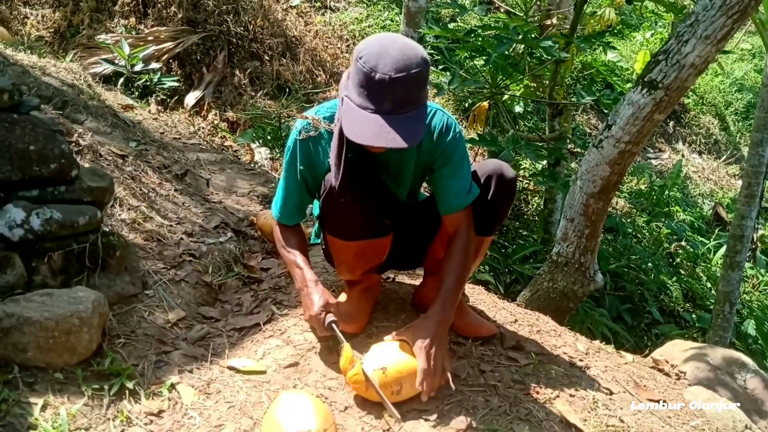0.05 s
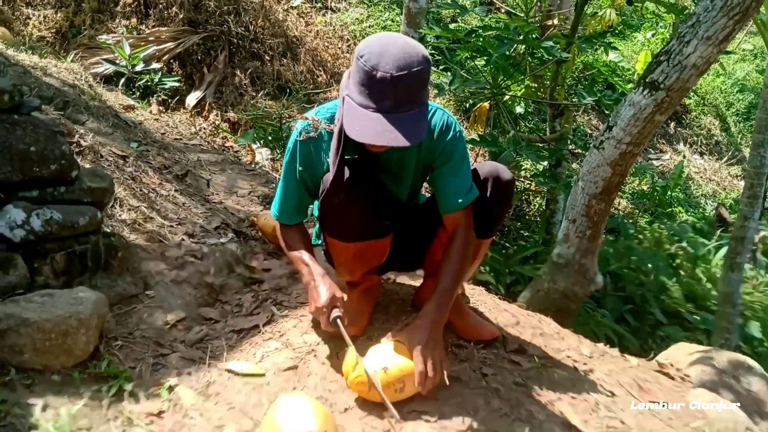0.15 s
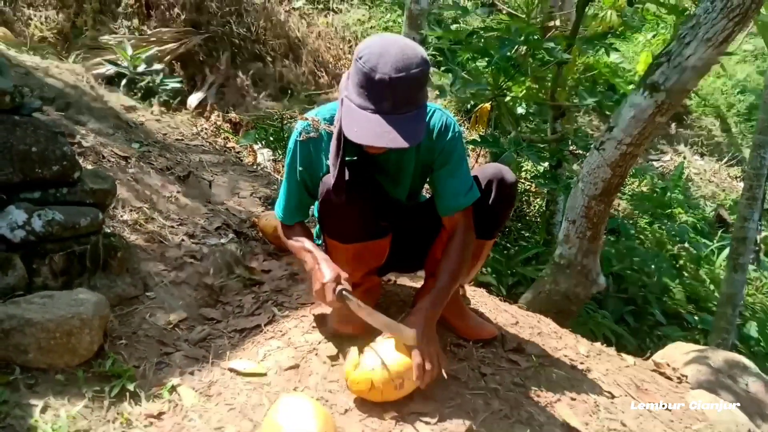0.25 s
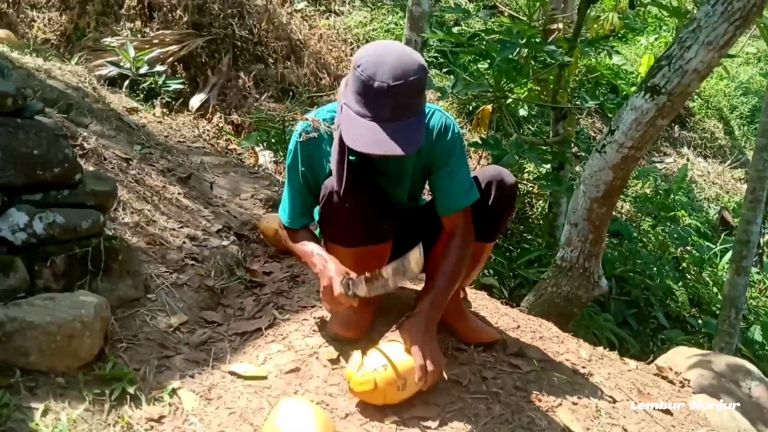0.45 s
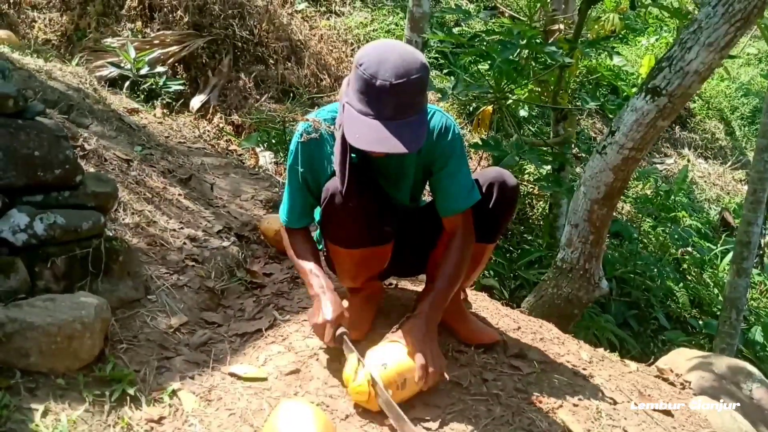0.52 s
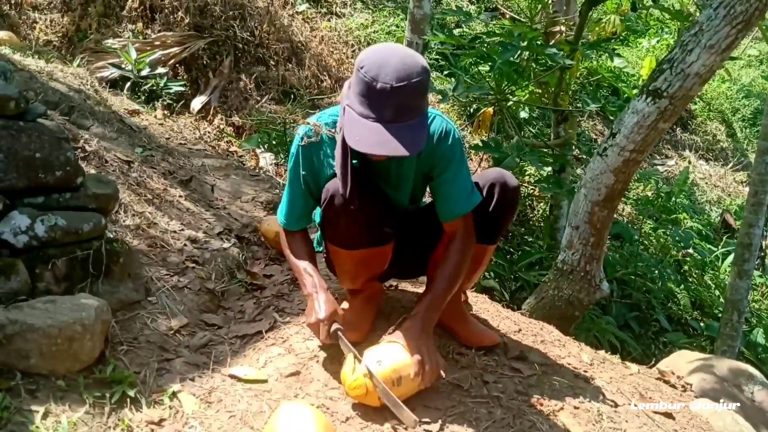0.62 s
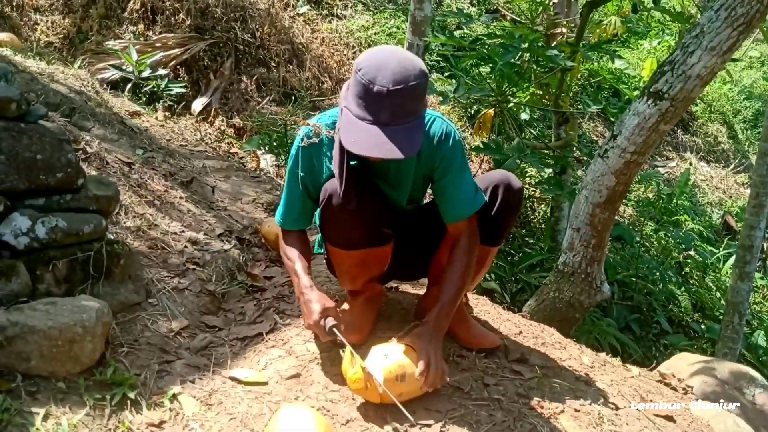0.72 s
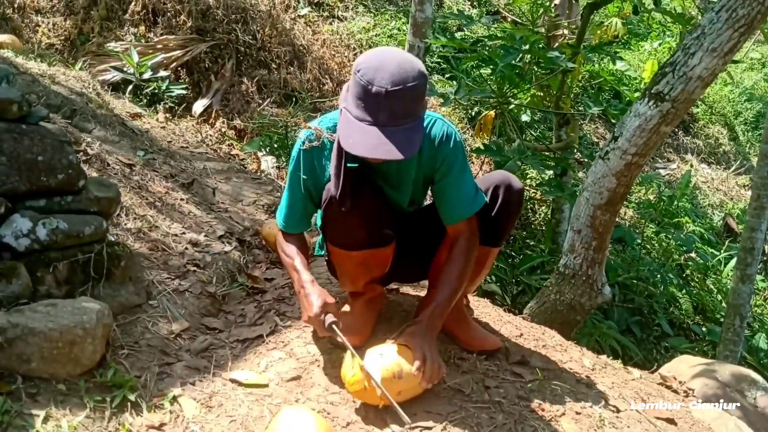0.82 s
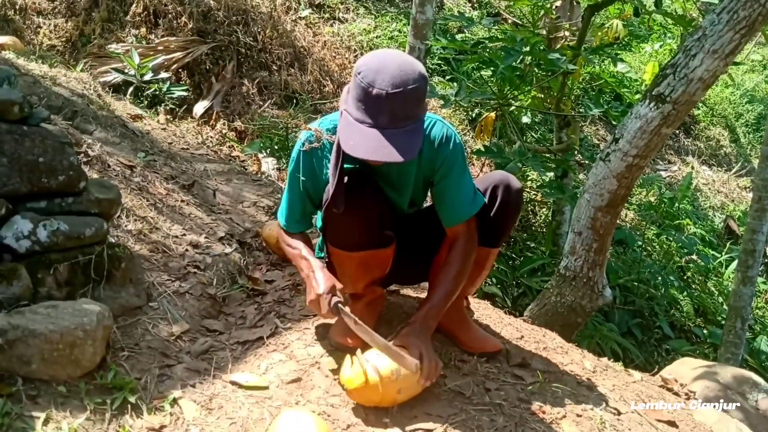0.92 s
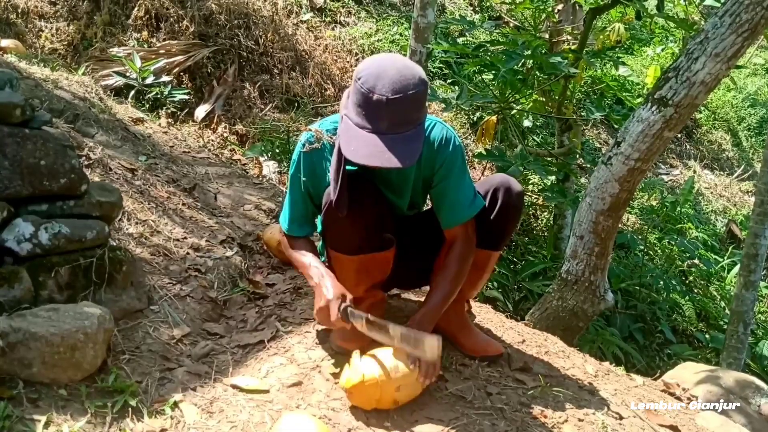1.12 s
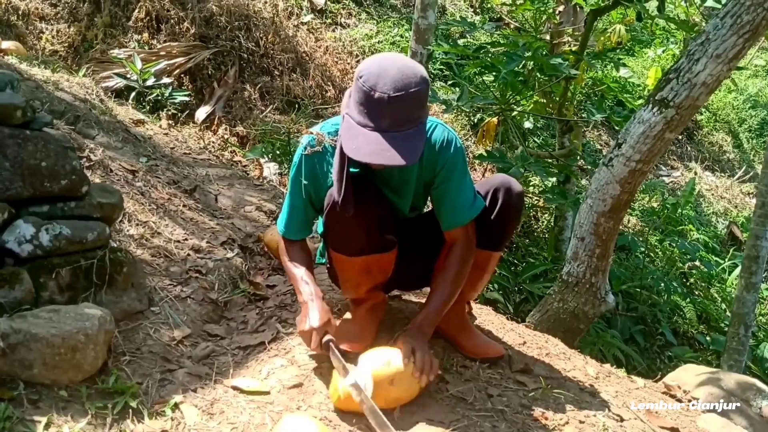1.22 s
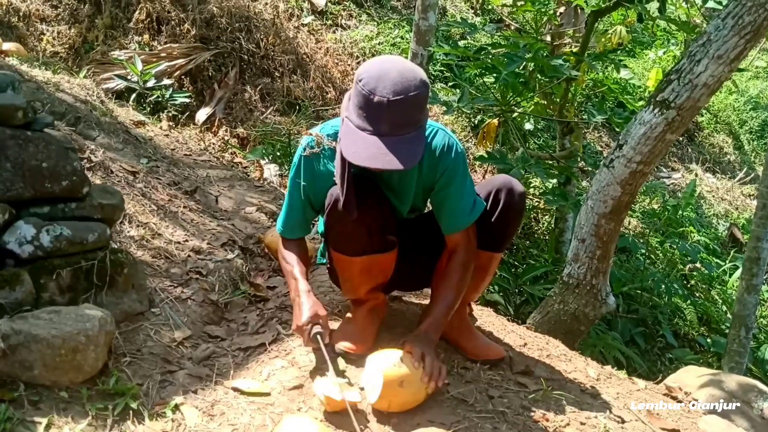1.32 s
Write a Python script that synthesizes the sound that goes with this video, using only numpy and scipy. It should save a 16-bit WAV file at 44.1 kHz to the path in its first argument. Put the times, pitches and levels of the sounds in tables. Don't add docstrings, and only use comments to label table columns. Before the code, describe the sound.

A machete chops a young coconut twice, crackling and wet, about two metres away in a garden. Before the first chop, fingers knock the handheld microphone's shell loudly enough to distort; leaves and distant water hiss softly.

```python
import sys
import numpy as np
from scipy import signal
from scipy.fft import rfft, irfft
from scipy.io import wavfile
from scipy.ndimage import uniform_filter1d

SR = 44100
rng = np.random.default_rng(int(sys.argv[2]) if len(sys.argv) > 2 else 0)


def ratio(d):
    e = np.asarray(d, float) / 20
    return 10 ** e


def int16_out(signal):
    q = np.round(np.clip(np.atleast_2d(signal).T, -1, 1) * 32767)
    wavfile.write(sys.argv[1], SR, q.astype(np.int16))


N = 59535

# (frequency [Hz], density [dB per Hz])
LEAVES_SPECTRUM = [(25, -31.5), (60, -10.5), (110, -7), (250, -10), (370, -2), (800, -9), (1300, -13.5),
                   (3400, -35)]
# (frequency [Hz], density [dB per Hz])
STREAM_SPECTRUM = [(1300, -10.5), (1700, -4), (2000, -.5), (2350, -0.5), (2650, -2.5), (2900, -8.5),
                   (3200, -13), (3700, -29.5)]
# (time [s], level [dB])
STREAM_LEVEL = [(0, -65), (.08, -61), (.14, -57), (.2, -62), (.24, -61), (.55, -64.5), (.7, -61),
                (1.0, -64), (1.35, -58.5)]
# (frequency [Hz], density [dB per Hz])
HISS_SPECTRUM = [(2120, -29), (3600, 3.5), (9620, -7.5), (14900, -2.5), (16000, -15), (16400, -35)]
# (time [s], level [dB])
GRIP_EFFORT = [(0, -49), (.05, -56.5), (.11, -49), (.2, -48.5), (.26, -82), (.4, -51), (0.499, -62.5),
               (.7, -51.5), (.8, -66.5), (1.35, -65)]
# (time [s], level [dB], frequency [Hz], t60 [s])
THUMPS = [(0.063, -42, 61, 0.086), (0.108, -38.5, 84.6, 0.13), (0.152, -40.5, 140, 0.095),
          (0.238, -11, 108, 0.047), (0.246, -24.5, 173, 0.052), (0.248, -30, 101.7, .3),
          (0.329, -26, 122, 0.097), (0.358, -30.5, 106.4, 0.074), (0.384, -44, 111.1, 0.13),
          (0.453, -36.5, 109.5, 0.04), (0.501, -46, 87, 0.032), (0.598, -45, 114, .08),
          (.660, -20, 173, 0.033), (0.665, -21, 90, 0.023), (0.679, -34.5, 130, .04),
          (1.261, -39, 120, 0.041)]
# (time [s], level [dB], hollow modes [dB], tick [dB], ring length [factor])
KNOCKS = [
    (.0628, -22, -5, -50, .95),
    (.1030, -26, -8, -50, 1.2),
    (.131, -36, -6, -45, .9),
    (.6468, -19, -7, -14, 1.9),
    (.2322, 6.5, 3.5, -28, 1.12),
    (.3244, 1.1, 1.2, -70, 1.02),
]
KNOCK_SIGNS = (1, -1, -1, 1, 1, -1)
# (frequency [Hz], t60 [s], left [dB], right [dB], hollow share [0-1])
SHELL_MODES = [(310, .035, -20, -19, .9), (478, .036, -7, -15, .9), (545, .021, -1, -8, .9),
               (852, .015, 14, -6, .1), (1045, .015, 1, -6, .6), (1305, .011, 5, -4, .1),
               (1850, .008, -2, -12, .1), (2490, .008, -6, -20, .1)]
# (frequency [Hz], t60 [s], left [dB], right [dB])
RATTLE_MODES = [(1085, 0.17, -32.5, -52), (1134, 0.22, -37.5, -46), (819, 0.16, -38, -46),
                (1460, .15, -44.5, -38.5), (2290, .16, -51, -51.5), (2600, 0.19, -52, -51.5)]
# (time [s], length [s], start [Hz], end [Hz], level [dB])
PEEPS = [
    (.219, 0.028, 2200, 2220, -76),
    (0.305, 0.029, 2403, 2050, -43),
    (0.352, 0.0146, 2340, 2440, -50),
    (0.81, 0.017, 2008, 2020, -47.5),
]
# (time [s], level [dB], flesh [dB], t60 [s], husk centre [Hz])
TEARS = [(.6000, -21, -7, 0.037, 2610), (0.603, -21.5, 3.5, 0.014, 2720), (0.6074, -22.5, -7, 0.082, 2126),
         (.613, -26.5, -27, 0.037, 1930), (0.6189, -26, 2.5, 0.016, 2560), (0.621, -44, -23, 0.033, 1920),
         (0.6473, -21.5, 0, .009, 2330), (0.65, -41.5, -3, 0.088, 2400), (1.2578, -32.5, -27, 0.07, 2400),
         (1.2592, -27, 4.5, 0.037, 1840), (1.2627, -32.5, -1, 0.064, 1990),
         (1.2742, -31.5, -8, 0.051, 2590), (1.28, -35, -1.5, 0.039, 2100), (1.289, -42, -24.5, 0.045, 2130),
         (1.2985, -42.5, -46, 0.09, 2040), (1.304, -52, 0, .2, 2400)]
# (frequency [Hz], width [Hz], level [dB])
FLESH_MODES = [(390, 157, -13.5), (549, 236, -5), (839, 178, -0.5), (1193, 193, -4), (1597, 160, -2)]
# (frequency [Hz], level [dB])
SPRAY_SPECTRUM = [(3000, -30.5), (5000, -22), (7500, -29), (10000, -35.5), (13000, -31.5), (16000, -42.5)]

LEAVES_DB, LEAVES_PAN_DB, STREAM_PAN_DB, HISS_DB = -58, .5, 3, -74
THUMP_RISE_S, THUMP_LEFT_DB = .0027, -17.5
RUB_DB, RUB_RIGHT_DB = -1.5, -11.5
SHELL_RISE_S, RIGHT_LATE_S, SHARPER_PER_DB_SOFT = .003, .0004, .002
RATTLE_RISE_S, RATTLE_DB_PER_TICK_DB, RATTLE_WAVER_DB = .0092, .12, 5.5
TICK_HZ, TICK_WIDTH_HZ, TICK_RISE_S, TICK_T60_S, TICK_RIGHT_DB = 2400, 2970, .0014, .008, -26.5
FIBRES_PER_S, CRACKLE_DB, FIRST_SNAP_DB = 11000, 3, 15
TEAR_RISE_S, TEAR_LAG_S, TEAR_PAN_DB = .0003, .00005, 3
HUSK_WIDTH_RATIO, HUSK_AIR, FLESH_SNAP = .24, .3, .14
SPRAY_PAN_DB, SPRAY_AIR, SPRAY_DB_PER_FLESH_DB = 8, 1.65, .00015
LOW_CUT_HZ, TOP_HZ, CEILING, OFFSET = 75, 16300, .97, .0014


def noise(channels=2):
    return rng.standard_normal((channels, N))


def band(x, hz, width_hz):
    return signal.lfilter(*signal.iirpeak(hz, hz / width_hz, fs=SR), x)


def unit(x):
    return x / np.sqrt(np.mean(x ** 2))


def pan(db):
    return ratio(db * np.array([[.5], [-.5]]))


def colour(x, points):
    hz, db = np.array(points, float).T
    f = np.arange(N // 2 + 1) * SR / N + 1e-3
    gain = ratio(np.interp(np.log(f), np.log(hz), db)) * (f > hz[0]) * (f < hz[-1])
    return irfft(rfft(x) * gain, N)


def curve(points):
    s, db = np.array(points).T
    return ratio(np.interp(np.arange(N) / SR, s, db))


def walk(rate_hz):
    k = int(SR / rate_hz)
    steps = np.repeat(rng.standard_normal(N // k + 1), k)
    smooth = uniform_filter1d(uniform_filter1d(steps, k), k)
    return unit(smooth[:N])


def blow(start_s, rise_s, t60_s):
    t = np.maximum(np.arange(N) / SR - start_s, 0)
    rise = (1 - np.exp(-t / rise_s)) ** 2
    return t, rise * np.exp(-np.log(1000) * t / t60_s)


def garden():
    mid, side = noise()
    edges_hz = 25 * 2 ** np.arange(0, 7.7, .6)
    rustle = 0
    for lo, hi in zip(edges_hz[:-1], edges_hz[1:]):
        wide = min(lo / 220, 1) * np.array([[1], [-1]])
        strip = colour(mid + wide * side, [(lo, 0), (hi, 0)])
        rustle = rustle + strip * ratio(2 * walk(9.6)) / np.sqrt(1 + wide ** 2)
    leaves = unit(colour(rustle, LEAVES_SPECTRUM)) * ratio(LEAVES_DB + 3) * pan(LEAVES_PAN_DB)
    stream = unit(colour(noise(), STREAM_SPECTRUM)) * curve(STREAM_LEVEL)
    stream = stream * ratio(3.5 + walk(30)) * pan(STREAM_PAN_DB)
    hiss = unit(colour(noise(), HISS_SPECTRUM)) * ratio(HISS_DB + 3 + .5 * walk(12))
    return leaves + stream + hiss


def grip():
    low = 0
    for s, db, hz, t60_s in THUMPS:
        t, env = blow(s, THUMP_RISE_S, t60_s)
        low = low + ratio(db) * 2 * env * np.sin(2 * np.pi * hz * t)
    effort = curve(GRIP_EFFORT)
    rumble = unit(band(band(noise(1)[0], 116, 140), 103, 110))
    low = low + effort * ratio(3 * walk(25)) * rumble
    grit = noise(1)[0] * ratio(4 * walk(60))
    rub = band(grit, 835, 220) + .21 * band(grit, 600, 148.3) + .5 * band(grit, 910, 120)
    rub = effort * ratio(RUB_DB) * unit(rub)
    left = ratio(THUMP_LEFT_DB) * low + rub
    right = low + ratio(RUB_RIGHT_DB) * np.roll(rub, 40)
    return np.array([left, right])


def knocks():
    out = np.zeros((2, N))
    tick = band(noise(), TICK_HZ, TICK_WIDTH_HZ)
    wavers = [ratio(RATTLE_WAVER_DB * walk(70)) for _ in RATTLE_MODES]
    for (s, db, hollow_db, tick_db, ring), sign in zip(KNOCKS, KNOCK_SIGNS):
        sharper = 1 + SHARPER_PER_DB_SOFT * np.clip(-db, 0, 20)
        rattle_db = db + RATTLE_DB_PER_TICK_DB * tick_db
        for side, late_s in enumerate((0, RIGHT_LATE_S)):
            for hz, t60_s, left_db, right_db, share in SHELL_MODES:
                t, env = blow(s + late_s, SHELL_RISE_S, t60_s * ring)
                gain = ratio(db + (left_db, right_db)[side] + share * hollow_db)
                gain = gain * sign * np.sign(.5 - share)
                out[side] += gain * env * np.sin(2 * np.pi * hz * sharper * t)
            for (hz, t60_s, left_db, right_db), waver in zip(RATTLE_MODES, wavers):
                t, env = blow(s, RATTLE_RISE_S, t60_s)
                gain = ratio(rattle_db + (left_db, right_db)[side])
                out[side] += gain * waver * env * np.sin(2 * np.pi * hz * t)
            _, env = blow(s + late_s, TICK_RISE_S, TICK_T60_S)
            out[side] += ratio(db + tick_db + side * TICK_RIGHT_DB) * 16 * env * tick[side]
    return out


def bird():
    out = 0
    for s, length_s, from_hz, to_hz, db in PEEPS:
        u = np.clip((np.arange(N) / SR - s) / length_s, 0, 1)
        cycles = length_s * (from_hz * u + (to_hz - from_hz) * u ** 2 / 2)
        out = out + ratio(db) * .52 * np.sin(np.pi * u) * np.sin(2 * np.pi * cycles)
    return out


def chops():
    snaps = (rng.random(N) < FIBRES_PER_S / SR) * rng.standard_normal(N)
    snaps = snaps * ratio(CRACKLE_DB * rng.exponential(size=N))
    snaps = np.clip(unit(snaps), -3.5, 3.5)
    air = noise()
    husk, wet, fine = 0, 0, 0
    for s, db, flesh_db, t60_s, hz in TEARS:
        drive = ratio(db) * blow(s, TEAR_RISE_S, t60_s)[1]
        push = drive * (snaps + HUSK_AIR * air)
        push[:, int((s + TEAR_RISE_S) * SR)] -= ratio(db + FIRST_SNAP_DB)
        width_hz = hz * HUSK_WIDTH_RATIO
        husk = husk + 5 * band(band(push, hz, width_hz), hz, 2 * width_hz)
        wet = wet + ratio(flesh_db) * (FLESH_SNAP * push + drive * snaps)
        fine = fine + ratio(SPRAY_DB_PER_FLESH_DB * flesh_db) * drive
    body = husk
    for hz, width_hz, db in FLESH_MODES:
        body = body + 7 * ratio(db) * band(band(wet, hz, width_hz), hz, 3 * width_hz)
    body = np.array([body[0], np.roll(body[1], int(TEAR_LAG_S * SR))])
    spray = colour(fine * (snaps + SPRAY_AIR * air), SPRAY_SPECTRUM) * 2.34
    return body * pan(TEAR_PAN_DB) + spray * pan(SPRAY_PAN_DB)


def scene():
    return garden() + grip() + knocks() + bird() + chops()


def top_cut(x):
    return signal.sosfilt(signal.butter(12, 16720, fs=SR, output="sos"), x)


def record(dry):
    x = signal.lfilter(*signal.butter(2, LOW_CUT_HZ, "high", fs=SR), dry)
    x = np.clip(x, -CEILING, CEILING)
    x = signal.sosfilt(signal.ellip(8, .2, 70, TOP_HZ, fs=SR, output="sos"), x)
    return top_cut(x + OFFSET)


dry = scene()
out = record(dry)
int16_out(out)
```